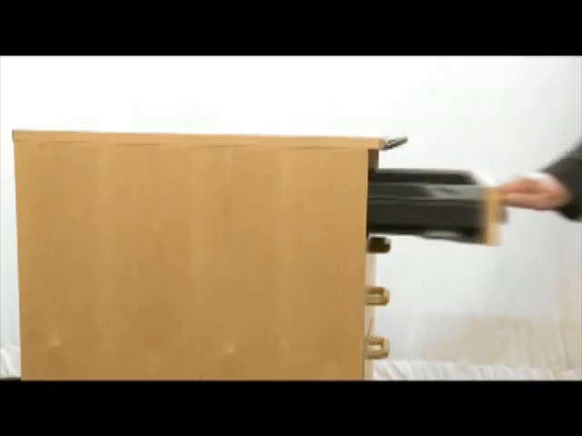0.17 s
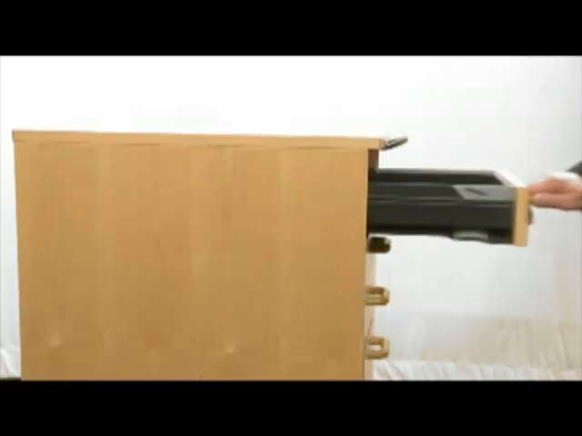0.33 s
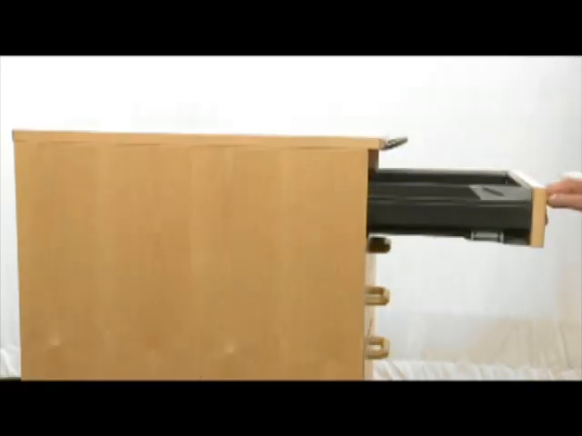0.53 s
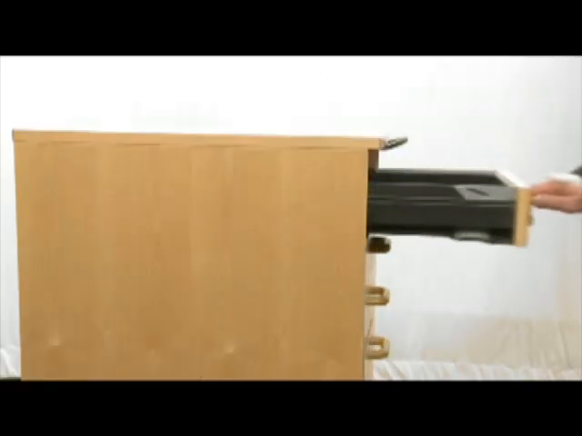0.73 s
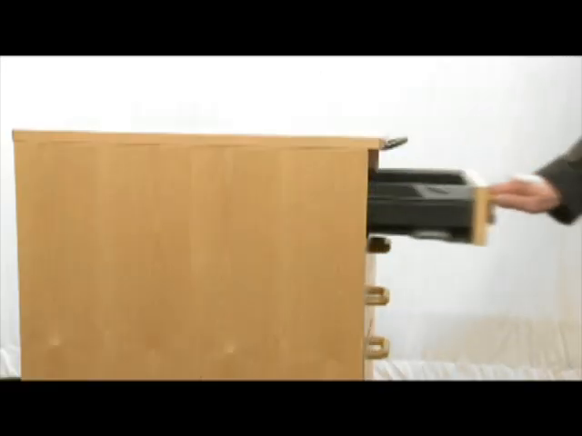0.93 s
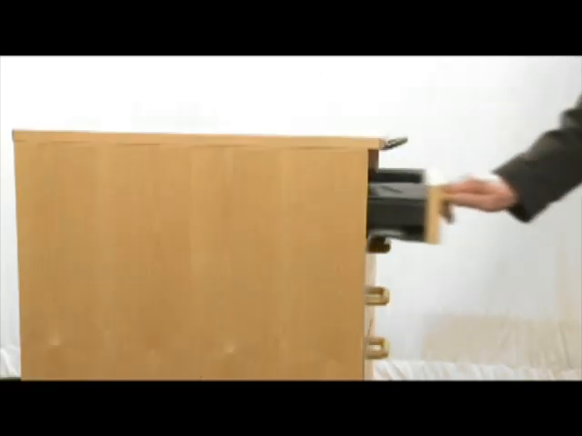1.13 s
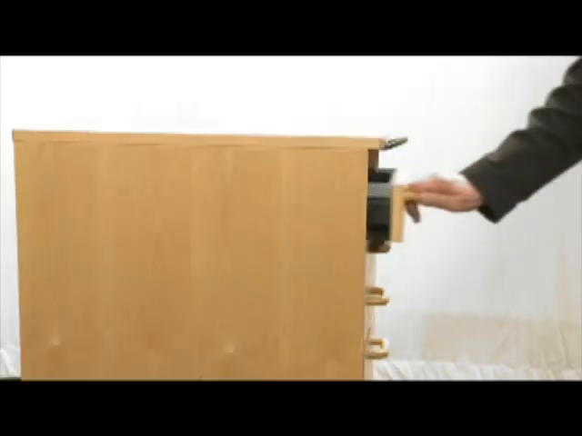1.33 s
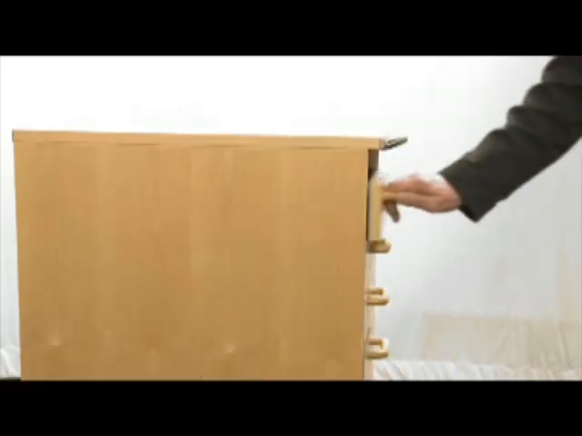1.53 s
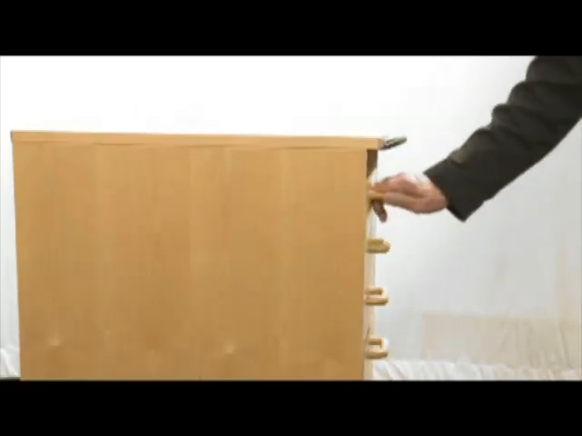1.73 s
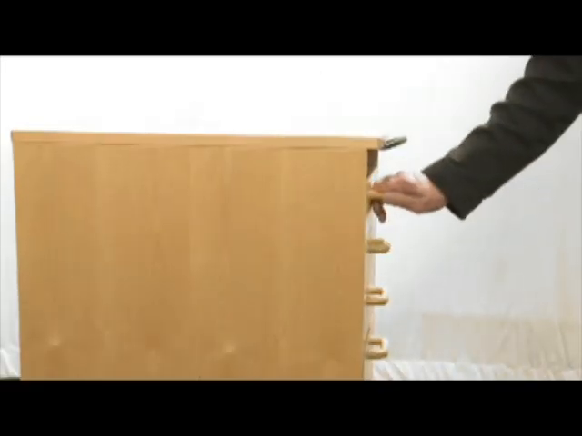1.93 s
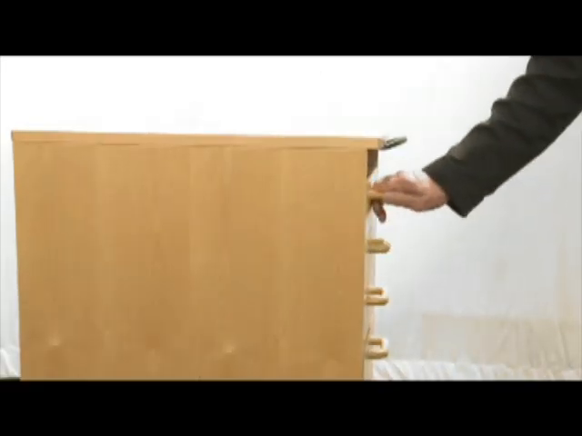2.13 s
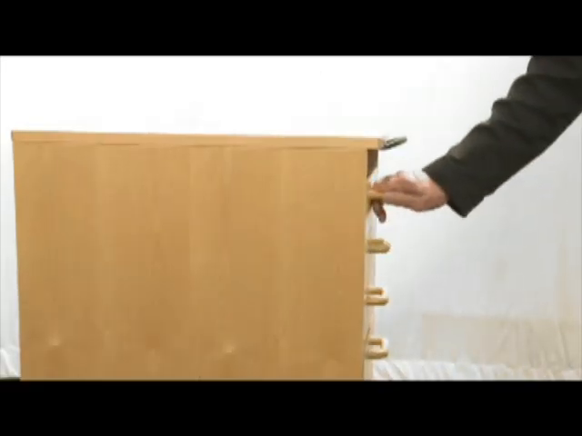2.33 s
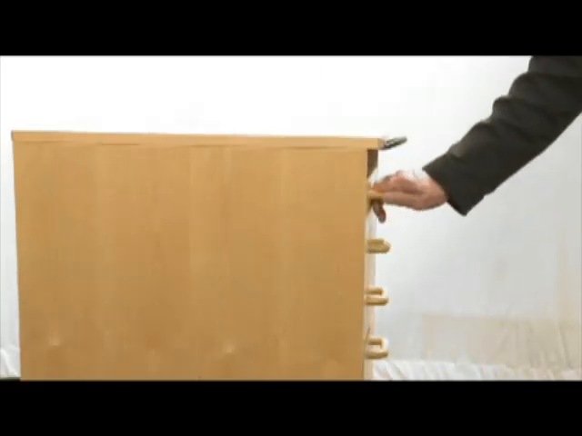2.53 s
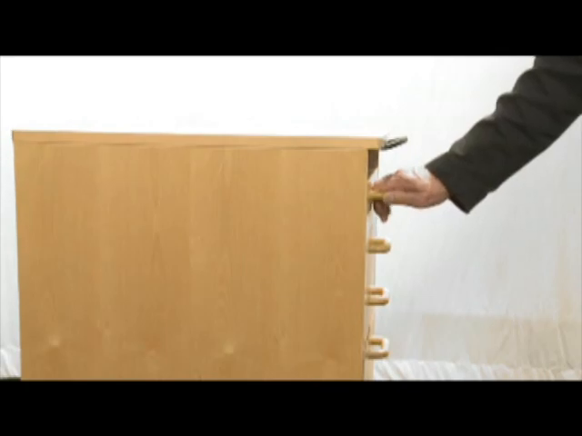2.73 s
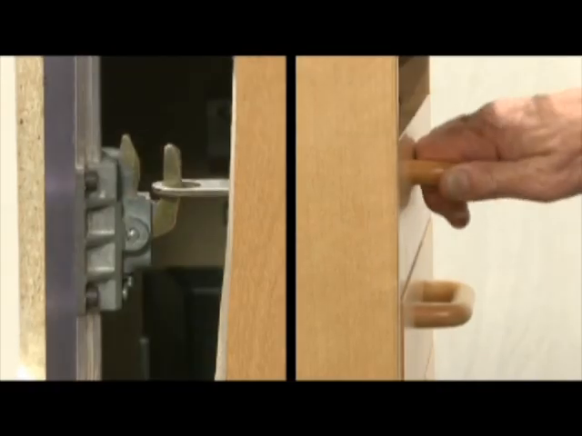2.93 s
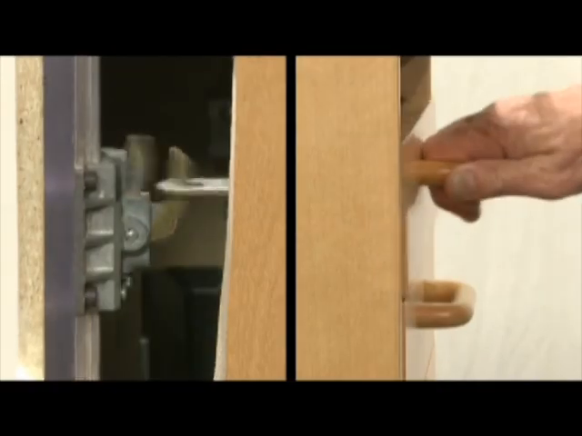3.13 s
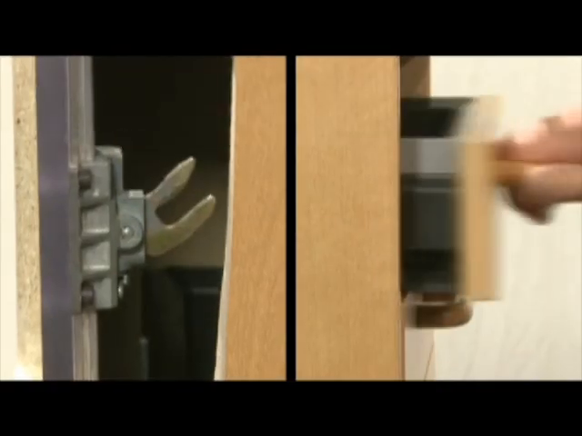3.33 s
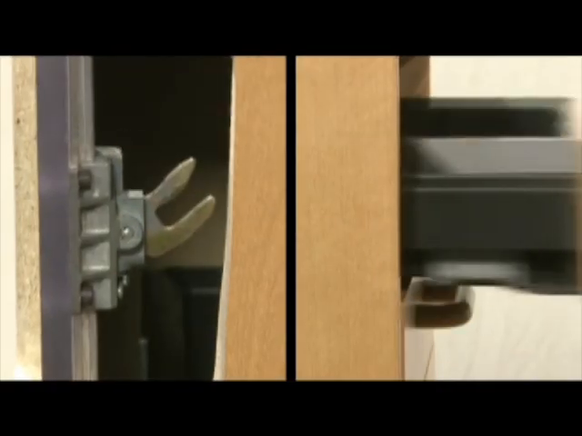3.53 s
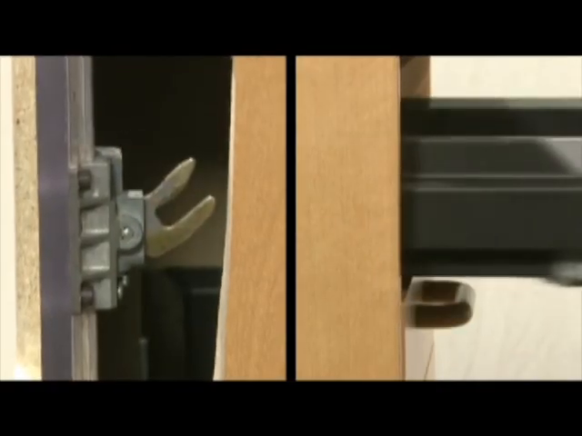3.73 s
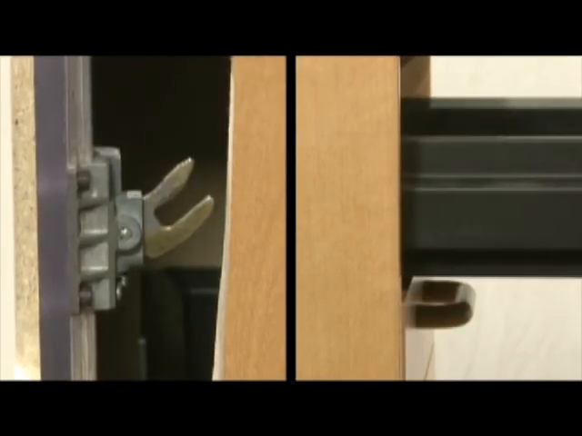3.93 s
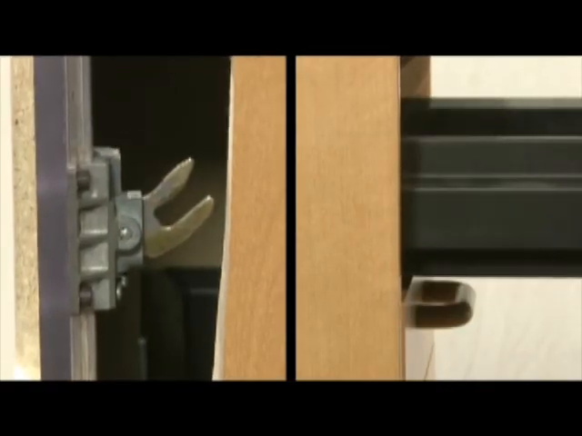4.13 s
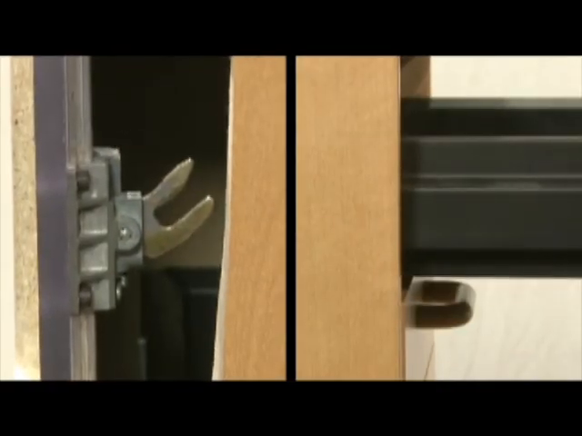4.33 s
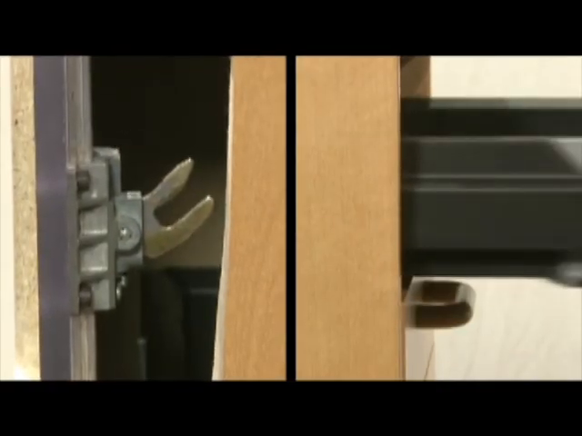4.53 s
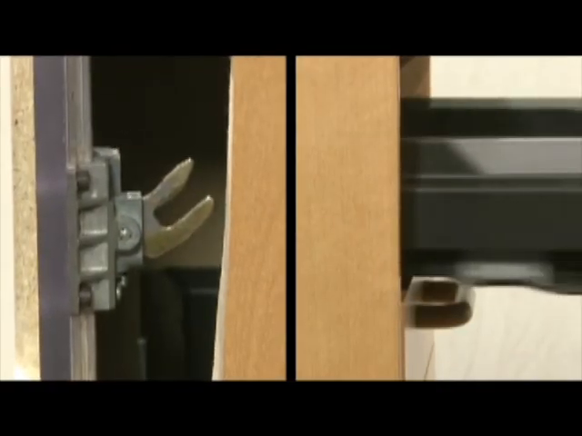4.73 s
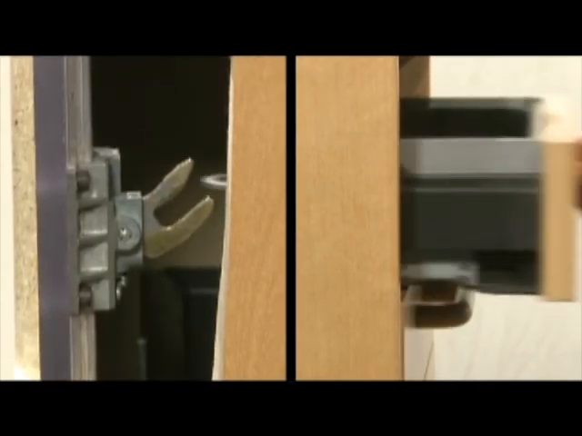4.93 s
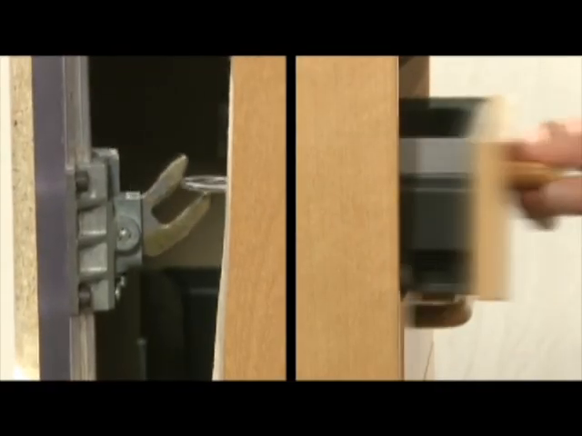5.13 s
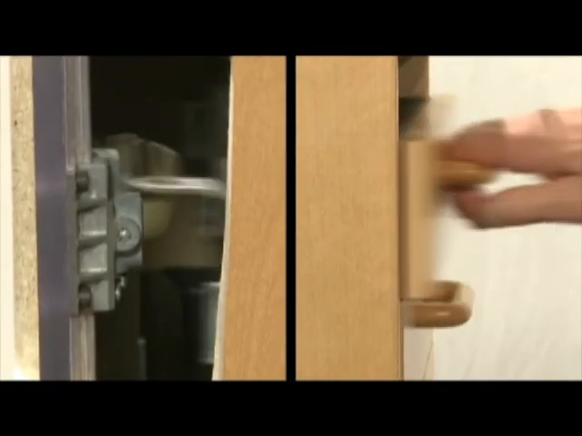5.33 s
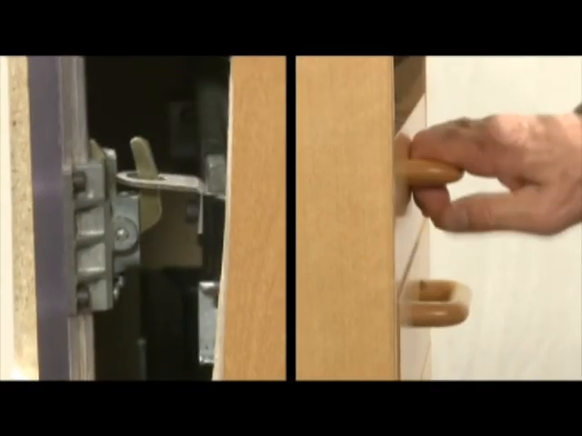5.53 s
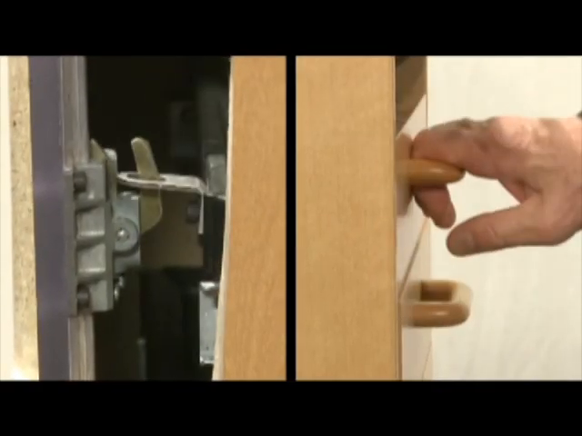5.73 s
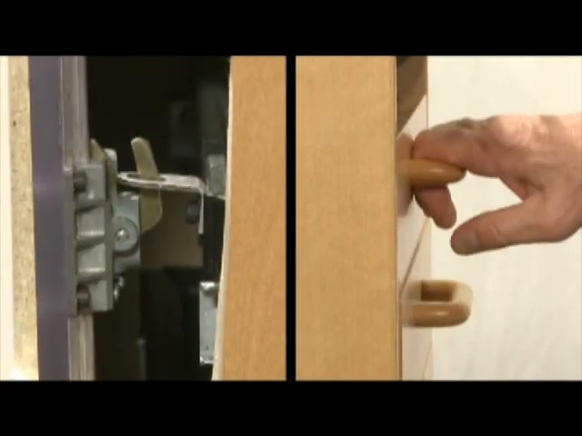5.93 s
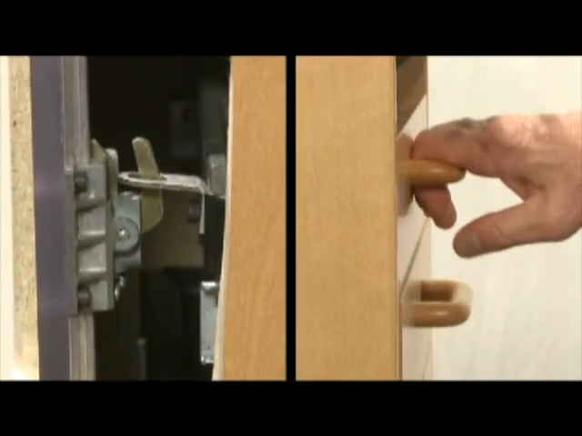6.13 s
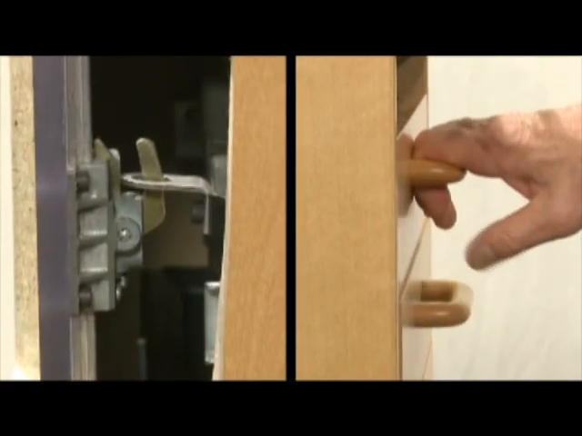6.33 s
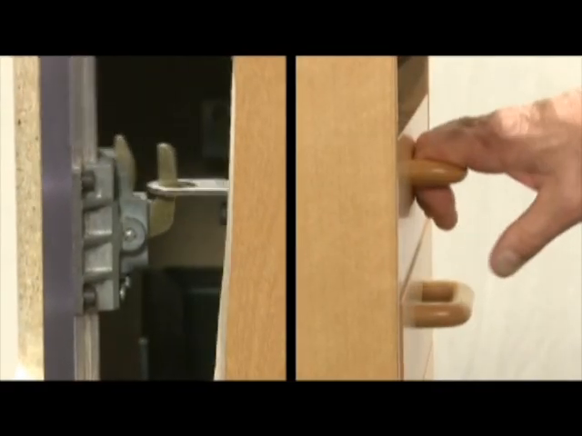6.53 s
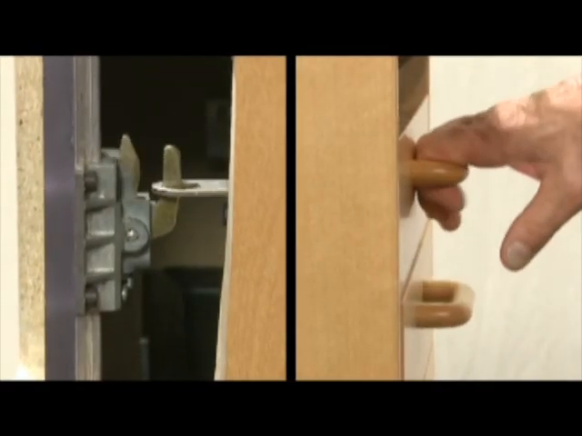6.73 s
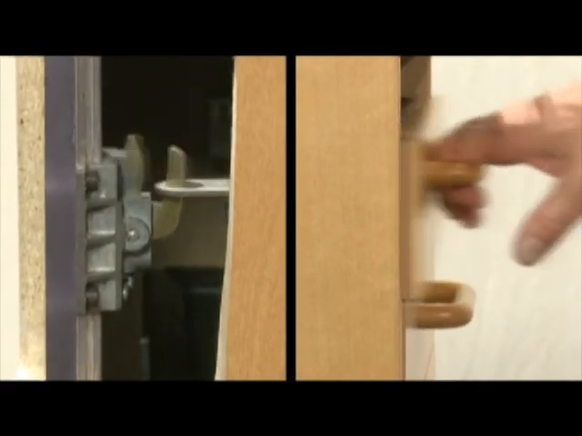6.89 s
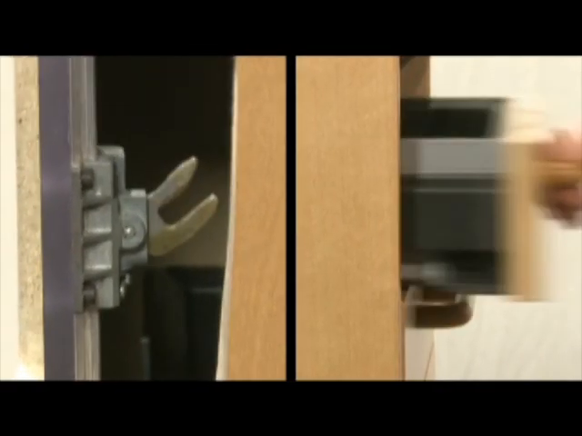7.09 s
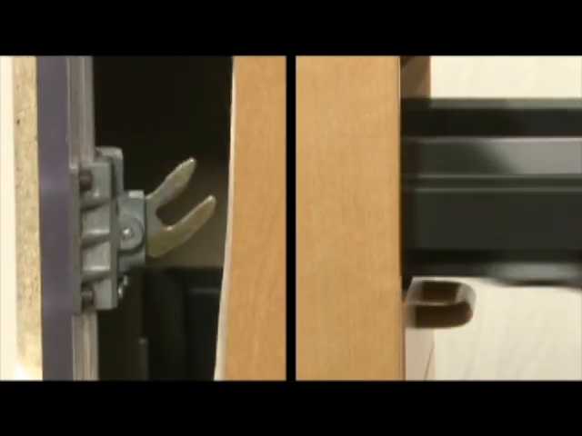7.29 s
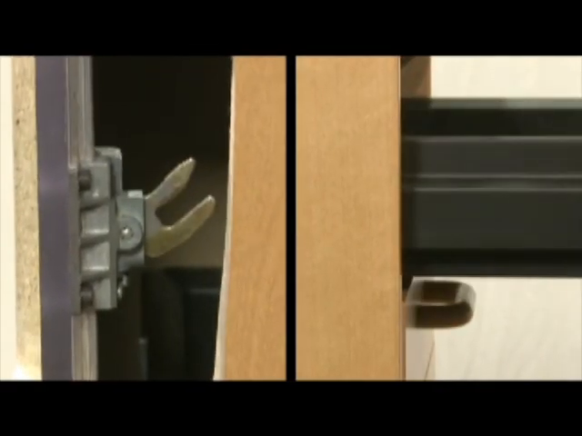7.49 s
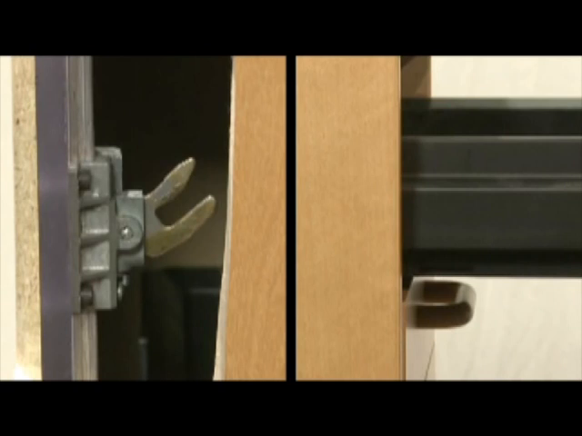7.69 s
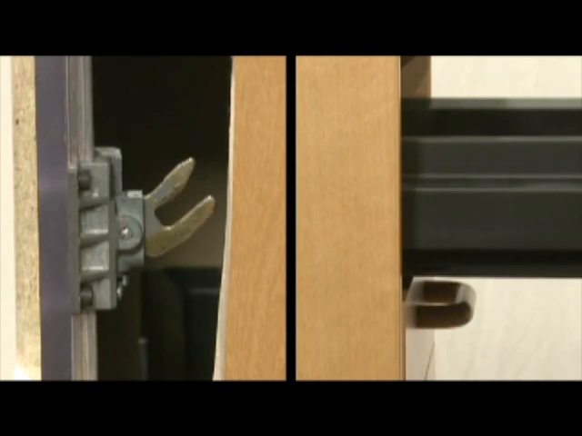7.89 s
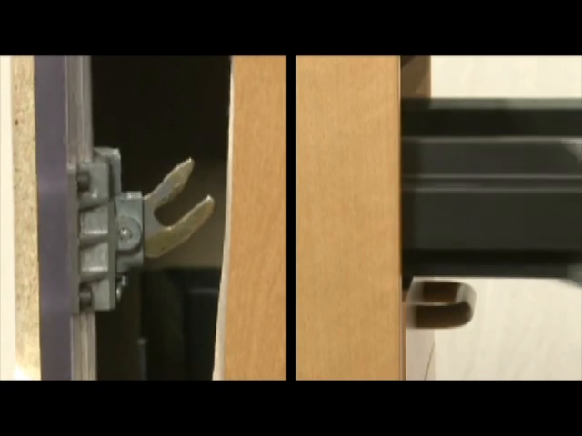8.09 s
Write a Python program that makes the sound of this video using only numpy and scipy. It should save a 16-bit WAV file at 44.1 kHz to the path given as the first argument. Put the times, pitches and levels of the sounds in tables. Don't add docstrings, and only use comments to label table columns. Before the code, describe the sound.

A wooden cabinet drawer rumbles out and back on steel runners, bumps shut, then a metal latch snaps sharply and rattles in a quiet room.

```python
import sys
import numpy as np
from scipy import signal
from scipy.fft import rfft, irfft
from scipy.io import wavfile
from scipy.ndimage import uniform_filter1d

SR = 44100
rng = np.random.default_rng(int(sys.argv[2]) if len(sys.argv) > 2 else 0)


def elevation(decibels):
    levels = np.asarray(decibels, float)
    return 10 ** (levels / 20)


def pcm_store(signal):
    levels = np.round(np.clip(np.atleast_2d(signal), -1, 1) * 32767)
    wavfile.write(sys.argv[1], SR, levels.astype(np.int16).T)


N = 359415
T = np.arange(N) / SR
CLOSE_S = 2.57
PATCHY_DB = 1.9


def walk(rate):
    knots = 1.9 * np.tanh(rng.standard_normal(int(rate * N / SR) + 2))
    return np.interp(T * rate, np.arange(len(knots)), knots)


def ring(force, modes, top_hz, patchy_db=0):
    out, power = 0, 0
    for k, (hz, width_hz, db) in enumerate(modes):
        b, a = signal.iirpeak(hz, hz / max(width_hz, 5), fs=SR)
        swell_db = patchy_db * walk(9) if patchy_db else 0
        sign = (-1) ** k
        out = out + sign * elevation(db + swell_db) * signal.lfilter(b, a, force)
        power += elevation(db) ** 2 * np.pi * width_hz / SR
    lowpass = signal.butter(N=4, Wn=top_hz, fs=SR, output="sos")
    return signal.sosfilt(lowpass, out) / np.sqrt(power)


def contact(times, db, t60, rise_s):
    force = np.zeros(N)
    t = T[:SR // 2]
    for s, level, decay in zip(times, db, t60):
        fade = np.exp(-np.log(1000) * t / np.clip(decay, .01, .4))
        shape = (1 - np.exp(-t / rise_s)) * fade
        i = int(s * SR)
        force[i:i + len(t)] += (elevation(level) * shape)[:N - i]
    return force * rng.standard_normal(N)


def coloured(points, db):
    hz, level = np.transpose(points)
    log_hz = np.log(np.arange(N // 2 + 1) * SR / N + 1)
    gain = elevation(np.interp(log_hz, np.log(hz), level, right=-80))
    noise = irfft(rfft(rng.standard_normal(N)) * gain, N)
    return noise * elevation(db) / noise.std()


def rumble():
    # frequency in Hz, level in dB per Hz
    spectrum = [(12, -18), (20, 0), (64, 2), (200, -14), (400, -29), (700, -42), (1000, -53.5)]
    drift_db = 1.1 * walk(5) + 4 * (T > CLOSE_S)
    return elevation(drift_db) * coloured(spectrum, -70)


def hiss():
    # frequency in Hz, level in dB per Hz
    spectrum = [(500, -6), (2000, -5), (4000, -3), (7000, -1), (11000, 0), (16000, 0)]
    return coloured(spectrum, -82)


def strokes():
    # time in seconds, load in dB
    side_slides = [
        [(0, -47), (.19, -50), (.27, -52.5), (.34, -49.5)],
        [(.7, -55.5), (.8, -51), (.96, -47.5), (1.1, -51.5), (1.2, -50)],
    ]
    # time in seconds, load in dB
    side_coasts = [
        [(.34, -54), (.43, -56.5), (.51, -64), (.57, -75), (.61, -71)],
        [(1.2, -52.5), (1.31, -57), (1.42, -62.5)],
        [(.63, -62), (.67, -60.5), (.7, -51)],
        [(1.45, -51.5), (1.526, -62.5), (1.57, -58.5)],
    ]
    # time in seconds, load in dB
    pulls = [
        [(3.24, -46), (3.35, -50), (3.5, -50), (3.756, -45), (3.8, -51.5), (3.9, -65)],
        [(7.06, -47.5), (7.27, -57), (7.54, -48.5), (7.68, -53), (7.77, -83)],
    ]
    # time in seconds, load in dB
    pushes = [
        [(3.93, -56), (3.965, -57), (3.98, -47.5), (4.17, -48), (4.3, -53.5), (4.45, -54.5)],
        [(7.8, -62), (7.83, -50.5), (7.845, -45.5), (7.93, -44.5), (8.15, -51)],
    ]
    # time in seconds, load in dB
    creeps = [
        [(4.45, -57), (4.6, -60), (4.85, -62), (4.88, -58.5), (5.01, -61.5)],
    ]
    # time in seconds, load in dB
    drags = [
        [(2.9, -53.5), (2.916, -48.5), (3.03, -55), (3.04, -81)],
        [(5.23, -61), (5.26, -58.5), (5.38, -57.5)],
    ]
    # time in seconds, load in dB
    fingers = [
        [(1.88, -67), (1.95, -68)],
        [(1.95, -67.5), (2.2, -75), (2.24, -89.5), (2.57, -77.5)],
        [(2.6, -68.5), (2.75, -66.5), (2.8, -63.5), (2.89, -63)],
        [(3.05, -88), (3.13, -76)],
        [(5.12, -78), (5.18, -78), (5.22, -58.5)],
        [(5.6, -65.5), (5.8, -76.5), (5.96, -78.5), (5.99, -72), (6.1, -78), (6.33, -71.5), (6.43, -69.5)],
        [(6.52, -59.5), (6.65, -72), (6.83, -73.5), (6.9, -84)],
    ]
    # time in seconds, load in dB
    seatings = [
        [(1.59, -48.5), (1.69, -55), (1.72, -60.5), (1.76, -64)],
    ]
    # start in seconds, snap in seconds, last level in dB
    wrenches = [
        (3.134, 3.196, -36.5),
        (6.905, 6.966, -34.5),
    ]
    # start in seconds, load in dB
    shudders = [
        (1.788, -44.5),
        (3.201, -36),
        (5.029, -47.5),
        (5.412, -40.5),
        (6.459, -42.5),
        (6.972, -37),
        (7.028, -40),
    ]
    wrench_rise_db = 25.5
    shudder_s, fall_db_per_s = 0.27, 269.5
    wrench_curves = [[(a, db - wrench_rise_db), (b, db)] for a, b, db in wrenches]
    fall_db = fall_db_per_s * shudder_s
    shudder_curves = [[(s, db), (s + shudder_s, db - fall_db)] for s, db in shudders]
    curves = dict(side=side_slides, coast=side_coasts, pull=pulls, push=pushes, creep=creeps, drag=drags,
                  finger=fingers, seat=seatings, wrench=wrench_curves, shudder=shudder_curves)
    return [(kind, np.transpose(curve)) for kind in curves for curve in curves[kind]]


def grit(per_s, spread_db, smooth):
    hits = rng.random(N) < per_s / SR
    jolts = hits * rng.standard_normal(N) * elevation(spread_db * rng.exponential(size=N))
    force = jolts / jolts.std() + smooth * rng.standard_normal(N)
    return force / force.std()


def rolling():
    # dull on panels, sharp on panels,
    # carcass, rails, balls, all in dB
    motion = dict(side=(-50, -50.5, -61, -69, -75.5), coast=(-49.5, -49.5, -60.5, -67.5, -74),
              pull=(-47.5, -48.5, -57, -64.5, -75), push=(-48.5, -49.5, -59.5, -66.5, -79),
              creep=(-48.5, -52.5, -53.5, -62.5, -77.5), drag=(-50, -48, -57, -61, -70.5),
              finger=(-49, -52.5, -61, -65.5, -71), seat=(-48, -54.5, -56, -72, -78.5),
              wrench=(-55.5, -47, -60, -57, -84.5), shudder=(-52.5, -49, -59, -62.5, -75.5))
    growth = (.98, 1.335, 0.44, 1.46, .95)
    # frequency in Hz, width in Hz, level in dB
    rail_modes = [(1293, 260, 14), (1530, 61, 6.5), (1710, 52, -8.5), (1936, 33, 10.5), (2150, 240, 0),
                  (2400, 90, -30), (2550, 160, -11), (1863, 2200, -10), (2500, 4500, -7.5)]
    # frequency in Hz, width in Hz, level in dB
    ball_modes = [(3720, 300, -19.5), (4460, 180, 3), (5090, 68, 14.5), (4220, 3900, 17), (7400, 4000, -7)]
    dull_hz = 460
    rustle_db, rustle_swing_db = -97, 5

    gain = np.zeros((5, N))
    for kind, (s, db) in strokes():
        i, j = int(s[0] * SR), int(s[-1] * SR)
        load_db = np.interp(T[i:j], s, db) + 50
        gain[:, i:j] += elevation(np.array(motion[kind])[:, None] + np.outer(growth, load_db))
    gain = uniform_filter1d(gain, size=200, mode="nearest")
    dull_gain, sharp_gain, carcass_gain, rails_gain, balls_gain = gain
    load = walk(30)
    rails_gain = rails_gain + elevation(rustle_db + rustle_swing_db * walk(17))

    coarse, fine = grit(1500, 1.0, 1.4), grit(4000, 1.5, 0.8)
    dull = signal.sosfilt(signal.butter(N=2, Wn=dull_hz, fs=SR, output="sos"), coarse)
    sharp = signal.sosfilt(signal.butter(N=2, Wn=dull_hz, btype="high", fs=SR, output="sos"), coarse)
    panel_force = (dull_gain * dull - sharp_gain * sharp) * elevation(1.3 * load)
    carcass_force = carcass_gain * elevation(.6 * load) * coarse
    rails = ring(rails_gain * elevation(2.7 * load) * fine, rail_modes, 4200, PATCHY_DB)
    balls = ring(balls_gain * elevation(0.9 * load) * fine, ball_modes, 10000)
    return panel_force, carcass_force, rails + balls


def panels(force):
    # frequency in Hz, width in Hz, level in dB
    side_modes = [(260, 32, -1.5), (355, 31, 0.5), (394.6, 23, 0), (486, 40, -5), (537.7, 11, -9),
                  (632, 33, -2), (755, 270, -11), (871, 110, -13), (990, 48, -23.5), (1153, 190, -19),
                  (495, 340, -10)]
    # frequency in Hz, width in Hz, level in dB
    close_modes = [(241, 40.6, 0), (355.7, 21, 1.5), (404.4, 17, -2), (567, 61, -4), (621, 25.8, -9.5),
                   (776.7, 67.6, 2), (771, 131, -3.5), (1000, 16, -14.5), (1054, 53, -25), (1191, 45, -23),
                   (545.4, 750, -13.5)]
    side = T < CLOSE_S
    from_side = ring(force * side, side_modes, 1900, PATCHY_DB)
    return from_side + ring(force * ~side, close_modes, 1900, PATCHY_DB)


def carcass(force):
    # frequency in Hz, width in Hz, level in dB
    body_modes = [(66.7, 38, -3), (92.6, 24, 3), (140, 23, -2.5), (173, 5.5, 0), (199.7, 10, 0.5)]
    return ring(force, body_modes, 520)


def squeaks():
    # start in seconds, end in seconds, pitch in Hz, level in dB
    slips = [
        (0.215, 0.325, 2150, -69),
        (1.075, 1.145, 2520, -77),
    ]
    partials_db = (-1, 0, -10)
    width_hz = 100
    out = 0
    for start, end, hz, db in slips:
        gate = np.clip(np.minimum(T - start, end - T) / 0.012, 0, 1)
        force = gate * elevation(db + 3.3 * walk(59.9)) * rng.standard_normal(N)
        partials = [(k * hz, k * width_hz, rel_db) for k, rel_db in enumerate(partials_db, 1)]
        out = out + ring(force, partials, 9000)
    return out


def pings():
    # start in seconds, level in dB, pitch in Hz
    stops = [(0.617, -49.5, 3460), (1.432, -47, 1880), (1.4694, -70, 2160), (2.587, -71, 2570),
             (3.917, -49.5, 3540), (4.86, -48.5, 3090), (5.0193, -35.5, 2400), (5.226, -48, 2400),
             (5.5954, -47.5, 2264), (6.359, -47, 1000), (6.4426, -40, 3860), (6.942, -29, 2220),
             (6.961, -28, 2240), (7.792, -46.5, 3710)]
    t60_s = 0.079
    out, t = np.zeros(N), T[:SR // 4]
    fade = np.exp(-np.log(1000) * t / t60_s)
    for s, db, hz in stops:
        pair = np.sin(2 * np.pi * hz * t) + .6 * np.sin(2 * np.pi * 1.07 * hz * t)
        i = int(s * SR)
        out[i:i + len(t)] += elevation(db - 13) * pair * fade
    return out


def knocks():
    # start in seconds, wood level in dB, steel level in dB
    bumps = [(.6185, -61, -49), (.6829, -49, -46), (1.4359, -46, -43.5), (1.468, -57, -49),
             (1.535, -53, -53), (1.64, -56, -53), (1.6704, -57.5, -50), (1.7722, -33.5, -32.5),
             (2.102, -59.5, -65), (2.8456, -57, -54), (2.896, -46, -66), (2.913, -43, -42.5),
             (3.1716, -41, -30.5), (3.918, -51, -45.5), (3.9709, -43, -43), (4.26, -53, -72),
             (4.8588, -47.5, -46), (5.0199, -50, -35.5), (5.0482, -41.5, -42.5), (5.2237, -44.5, -47),
             (5.3123, -47, -44), (5.5978, -68, -45), (5.6394, -62, -60.5), (6.354, -56, -57),
             (6.4434, -43, -31.5), (6.94, -42, -32), (7.0296, -38, -50), (7.7926, -57, -47),
             (7.8368, -42, -42.5)]
    # start in seconds, wood level in dB, steel level in dB
    clicks = [(1.7612, -39.5, -43), (1.926, -51, -52.5), (2.5838, -54.5, -54.5), (2.636, -55.5, -55),
              (5.1138, -55.5, -50), (6.4607, -36, -63), (6.537, -57.5, -49.5), (6.606, -54, -52)]
    # start in seconds, wood level in dB, steel level in dB
    snaps = [
        (3.1894, -41.5, -19),
        (5.3845, -35.5, -24.5),
        (6.9601, -36.5, -19),
    ]
    # start in seconds, wood level in dB, steel level in dB
    thuds = [(1.5811, -37, -47.5), (3.1333, -44, -82.5), (5.3598, -47, -48.5), (5.4044, -38, -44),
             (5.4463, -47, -48), (5.9794, -61, -86.5), (6.905, -45, -57.5)]
    # start in seconds, wood level in dB, steel level in dB
    thumps = [(1.586, -72, -90), (2.4, -68.5, -88), (5.392, -64, -91), (6.1, -71, -90), (3.25, -62, -90)]
    # carcass above wood in dB, latch above steel in dB, t60 in seconds
    blow = dict(bump=(-10, -22, 0.085), click=(-10, -4, .065), snap=(-7.5, -9.5, 0.1), thud=(0, -17, 0.046),
            thump=(14.6, -21.5, 0.13))
    # frequency in Hz, width in Hz, level in dB
    struck_modes = [(1056, 150, 1.5), (1317, 50, 2.5), (1604, 140, -4), (1717, 45, 2.5), (1933, 50, -4),
                    (2033, 66, -1.5), (2324, 40, -3.5), (2390, 43, 2.5), (2926, 23, -14), (3307, 17, -14.5),
                    (4020, 54, -12), (4464, 50, -11.5), (2680, 1040, -7.5)]
    # frequency in Hz, width in Hz, level in dB
    latch_modes = [(5280, 600, 0), (8100, 1200, -8), (8880, 500, 2.5), (11040, 670, -0.5),
                   (13900, 3000, -17.5)]

    kinds = dict(bump=bumps, click=clicks, snap=snaps, thud=thuds, thump=thumps)
    rows = [(*row, *blow[kind]) for kind in kinds for row in kinds[kind]]
    s, wood_db, steel_db, carcass_db, latch_db, t60 = np.transpose(rows)
    rails = ring(contact(s, steel_db - 9.0, 0.79 * t60, 0.0009), struck_modes, 7500)
    latch = ring(contact(s, steel_db + latch_db - 11, .7 * t60, 0.00025), latch_modes, 20000)
    panel_force = contact(s, wood_db + 0.5, 1.22 * t60, 0.0011)
    carcass_force = contact(s, wood_db + carcass_db + 6, 1.25 * t60, 0.0027)
    return panel_force, carcass_force, rails + latch


def rattle():
    # start in seconds, level in dB
    ticks = [(3.2394, -57), (3.2744, -62), (3.315, -55.5), (3.3902, -61), (3.471, -59), (5.4766, -56),
             (5.5154, -70), (7.01, -58), (7.0449, -59), (7.087, -57), (7.125, -59.5), (7.165, -58),
             (7.1965, -65), (7.214, -68), (7.2498, -59), (7.2709, -64), (7.3094, -62)]
    # frequency in Hz, width in Hz, level in dB
    fork_modes = [(7840, 1100, -11), (9900, 630, -2.5), (10400, 2100, -9)]
    t60_s = 0.028
    s, db = np.transpose(ticks)
    return ring(contact(s, db + 3.5, np.full(len(s), t60_s), 0.0002), fork_modes, 15130)


def spring():
    # start in seconds, pitch in Hz, level in dB, t60 in seconds
    lines = [
        (5.6, 900, -8, .2),
        (5.635, 1500, 2, .32),
        (5.6, 2556, 1, .36),
        (5.6, 3245, -6, .18),
    ]
    out = 0
    for s, hz, db, t60 in lines:
        t = np.maximum(T - s, 0)
        out = out + elevation(-70 + db) * np.exp(-np.log(1000) * t / t60) * np.sin(2 * np.pi * hz * t)
    return out


def room(x):
    t60_s, level_db = .17, -19
    t = T[:SR // 2]
    tail = rng.standard_normal(len(t)) * np.exp(-np.log(1000) * t / t60_s) * (t > .006)
    tail = signal.lfilter([1], [1, -.6], tail)
    return elevation(level_db) * signal.fftconvolve(x, tail / np.sqrt(np.sum(tail ** 2)))[:N]


def scene():
    panel_force, carcass_force, steel = np.add(rolling(), knocks())
    wood = panels(panel_force) + carcass(carcass_force)
    drawer = wood + steel + squeaks() + pings() + rattle() + spring()
    return (drawer + room(drawer) + rumble())[None]


def low_pass(x):
    return signal.sosfilt(signal.butter(12, 16510, fs=SR, output="sos"), x)


def record(dry):
    mix = dry[0] + hiss()
    return low_pass(mix)


dry = scene()
out = record(dry)
pcm_store(out)
```